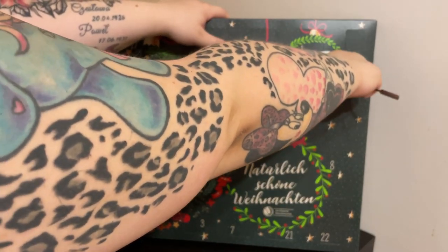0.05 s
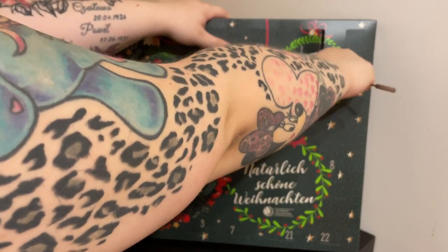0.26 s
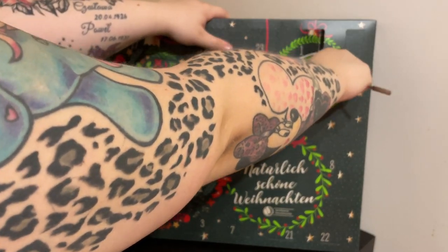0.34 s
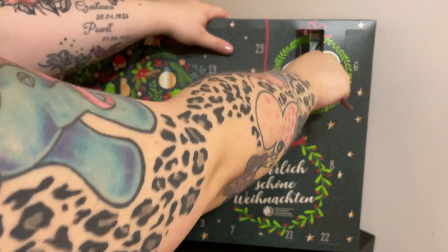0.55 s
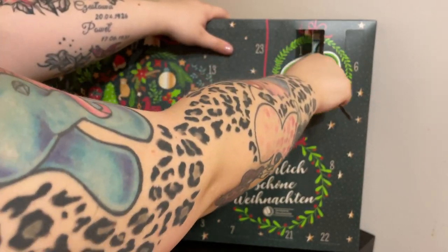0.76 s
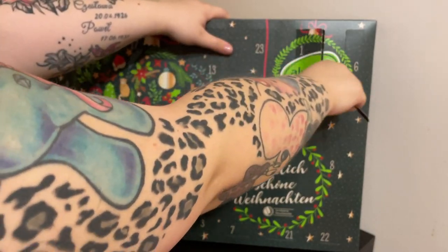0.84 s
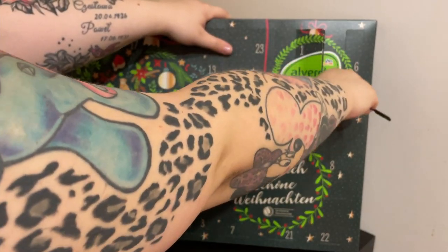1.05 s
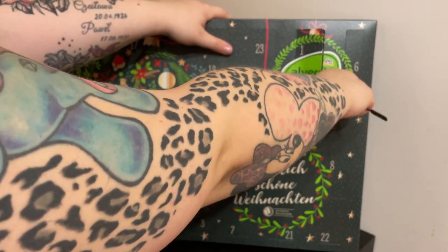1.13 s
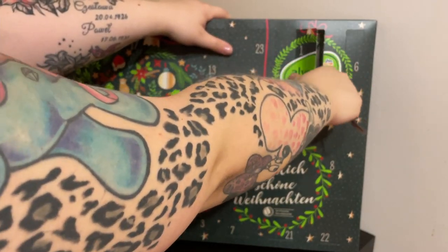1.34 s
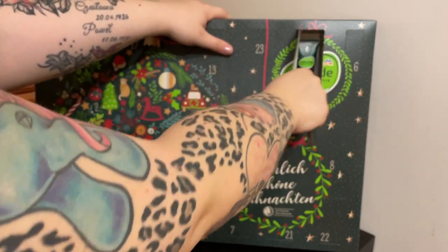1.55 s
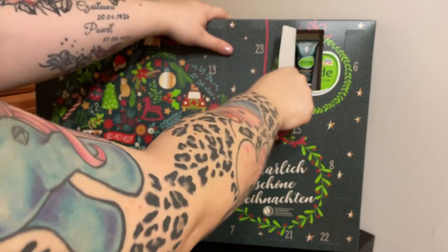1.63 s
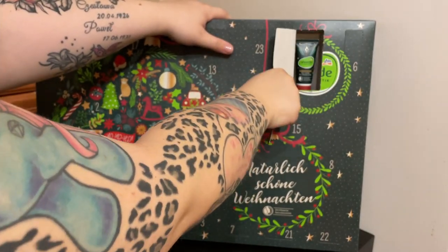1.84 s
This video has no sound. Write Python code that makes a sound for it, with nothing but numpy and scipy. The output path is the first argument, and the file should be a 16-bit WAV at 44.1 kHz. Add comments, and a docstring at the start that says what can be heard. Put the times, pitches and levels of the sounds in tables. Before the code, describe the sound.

A perforated cardboard flap is pried open: faint finger taps, a quick cluster of crisp snaps and a short rip, a quieter pause, then two more hollow pops and light rubbing, close-miked in a small quiet room.

```python
"""Opening a perforated cardboard box

Fingers pry open a perforated flap in a shallow cardboard box, close to the microphone in a small room.
After a faint click, paper bridges snap: noise cracks through the card and the box modes thump.
Random grains rip fibres and rub fingertips over the card; taps knock it and a nail hisses along it.
The flap creaks in almost regular slips, and rings when it is nudged.
A dense decaying tail, one late bass echo and quiet filtered noise make the room."""
import sys
import numpy as np
from scipy import signal
from scipy.fft import rfft, irfft
from scipy.io import wavfile

SR = 44100
rng = np.random.default_rng(int(sys.argv[2]) if len(sys.argv) > 2 else 0)


def transcribe(u):
    """Save the signal u as a 16-bit wav file named by the first command-line argument.

    u: samples, shape (n,) or (channels, n), limited to [-1, 1]; the rate is SR.
    q: integer samples, one column per channel.
    """
    v = np.clip(np.atleast_2d(u).T, -1, 1)
    q = np.round(v * 32767).astype(np.int16)
    wavfile.write(sys.argv[1], SR, q)


N = 83790
HZ = np.fft.rfftfreq(8192, 1 / SR)  # frequencies at which filter gains are given
BLOW_S = 0.015  # time over which the level of a blow is reckoned
BLOW_GAIN = np.sqrt(SR * BLOW_S)

# Band centres of a snap [Hz]
BANDS_HZ = [100, 280, 630, 1650, 4500, 11000]
# Bridges snapping, levels before the overall tone:
# (time [s], ring of the freed flap [Hz], ring of the torn edge [Hz], level in each of six bands [dB])
SNAPS = [(0.1971, 715, 2390, -53, -34.5, -25, -33, -41, -44.5),
         (0.2323, 1519, 2193, -39, -24.5, -18.5, -22, -35, -37.5),
         (0.2627, 1665, 2440, -44.5, -57, -19, -25.5, -41, -36),
         (0.2668, 312, 1130, -40.5, -18, -22, -27, -41, -50),
         (0.2931, 286, 1960, -37, -26.5, -26, -27, -36, -44.5),
         (0.411, 563, 3425, -51.5, -30.5, -25, -25, -37.5, -37),
         (0.542, 241.4, 3840, -40.5, -24.5, -29, -36.5, -55.5, -40.5),
         (1.4538, 292.7, 799, -34.5, -26.5, -26, -37, -38.5, -41),
         (1.592, 549, 808, -36, -21.5, -27.5, -31.5, -39, -42)]


def add_snaps(box, modes):
    """Paper bridges fail one by one, each amid a swell of tiny fractures."""
    for time, flap_hz, edge_hz, *levels in SNAPS:
        add(box, *strain(time, edge_hz, levels))
        add(box, time, snap(flap_hz, edge_hz, levels, modes))


FLAP_DB, FLAP_CYCLES = -5, 28  # the flap dies 60 dB in this many cycles
EDGE_DB, EDGE_CYCLES = -5.5, 47  # so does the torn edge


def snap(flap_hz, edge_hz, levels, modes):
    """A bridge gives way: a blow to the box, and the freed flap and its torn edge ring briefly."""
    bands = list(zip(BANDS_HZ, levels))
    flap = amp(FLAP_DB + read(bands, flap_hz)) * mode(flap_hz, FLAP_CYCLES / flap_hz)
    edge = amp(EDGE_DB + read(bands, edge_hz)) * mode(edge_hz, EDGE_CYCLES / edge_hz)
    return blow(BANDS_HZ, levels, modes) + (flap + edge) * BLOW_GAIN


STRAIN_S, STRAIN_DB = 0.0068, -17.5  # time constant on either side of the snap; level against the snap


def strain(time, edge_hz, levels):
    """A quick, ragged swell of tiny fractures around a snap, coloured by the tearing edge."""
    noise = rng.standard_normal((2, 2048)) * rng.exponential(1, 2048) ** 2
    t = (np.arange(noise.shape[1]) - noise.shape[1] / 2) / SR
    swell = unit(noise * np.exp(-abs(t) / STRAIN_S))
    extra_db = STRAIN_DB + BRIGHT_DB * bump(edge_hz)
    return time + t[0], toned(swell, BANDS_HZ, levels, extra_db) * BLOW_GAIN


# Modes of the hollow box, levels before BOX_DB and the blow: (frequency [Hz], level [dB], t60 [s])
BOX = [(226.3, -9, 0.17), (247, -3.5, 0.14), (294.2, 2, 0.16), (346.3, 0.5, 0.15), (514.4, -13, 0.086),
       (591.8, -6, 0.084), (718, -14, 0.11), (771, -17, 0.22), (1113, -1.5, 0.045)]
BOX_DB = -10


def box_modes():
    """The hollow box resonates at several frequencies, each with its own decay."""
    return np.array([mode(hz, t60) for hz, _, t60 in BOX])


def blow(centres, levels, modes):
    """The panel cracks and the modes of the box ring on."""
    hz, db, _ = np.transpose(BOX)
    blow_db = read(list(zip(centres, levels)), hz)
    out = np.tensordot(amp(BOX_DB + db + blow_db), modes, 1)
    add(out, 0, toned(panel(), centres, levels))
    return out * BLOW_GAIN


# Ring of the card panel: (frequency [Hz], t60 [s])
PANEL = [(100, 0.015), (300, 0.15), (700, 0.098), (2000, 0.034), (12000, 0.017)]
CRACK_S, CRACK_DB = 0.0011, 1.5  # time to the crack's peak; level against the ring


def panel():
    """Middle and side response of the card: a crack and its short ring."""
    body = ring(PANEL, rise_s=0.0077, size=8192)
    u = np.arange(body.shape[1]) / SR / CRACK_S
    crack = unit(rng.standard_normal(body.shape) * u * np.exp(-u))
    return flat(body + amp(CRACK_DB) * crack)


# Overall tone: uneven mids, a narrow dip near 8 kHz, steeply falling top: (frequency [Hz], gain [dB])
TONE = [(30, -29), (65, -3.5), (170, -4.5), (300, -1.5), (400, -7), (560, -4.5), (900, -5.5), (1400, -6.5),
        (2300, -2.5), (2700, -6.5), (3600, -3), (7200, -7), (8200, -21.5), (9500, -8.5), (13000, -13.5),
        (15500, -30.5)]


def toned(x, centres, levels, extra_db=0):
    """Gives a flat sound the overall tone and a level in each band."""
    # Spread each level over a bandwidth that grows with its centre
    density = np.array(levels) - 10 * np.log10(2 * np.array(centres) / SR)
    db = read(list(zip(centres, density)), HZ) + read(TONE, HZ) + extra_db
    return np.array([colour(c, db) for c in x])


# Fibres ripping, levels before the overall tone:
# (start [s], crest [s], end [s], contact resonance [Hz], body [dB], rasp [dB], fizz [dB])
RIPS = [(0.246, 0.26, 0.272, 2300, -35, -29.5, -36), (0.482, 0.486, 0.506, 1860, -36.5, -43, -40),
        (0.493, 0.535, 0.566, 3360, -48, -51.5, -47)]
RIP_GRAINS_PER_S, RIP_SPREAD_DB = 2400, 8.5


def add_rips(box):
    """Fibres part in dense, uneven grains."""
    for start, crest, end, hz, *levels in RIPS:
        add(box, start, stroke(start, crest, end, hz, levels, RIP_GRAINS_PER_S, RIP_SPREAD_DB))


# Fingertips and flap sliding, levels before the overall tone:
# (start [s], crest [s], end [s], contact resonance [Hz], body [dB], rasp [dB], fizz [dB])
RUBS = [(0.043, 0.066, 0.135, 2400, -54.5, -64, -67.5), (0.761, 0.812, 0.875, 2110, -56, -67.5, -68.5),
        (1.111, 1.148, 1.36, 2600, -64, -68, -97), (1.276, 1.307, 1.36, 1810, -53.5, -66.5, -80),
        (1.749, 1.77, 1.84, 2800, -50.5, -51, -72.5)]
RUB_GRAINS_PER_S, RUB_SPREAD_DB = 850, 5


def add_rubs(box):
    """Skin and card slide in sparser, more even grains than a rip."""
    for start, crest, end, hz, *levels in RUBS:
        add(box, start, stroke(start, crest, end, hz, levels, RUB_GRAINS_PER_S, RUB_SPREAD_DB))


def stroke(start, crest, end, bright_hz, levels, rate, spread_db):
    """Fibres catch and let go at random under a stroke that swells and fades."""
    t = np.arange(start, end, 1 / SR)
    size_db = spread_db * np.minimum(rng.exponential(1, SR // 2), 3)
    sizes = amp(size_db) * rng.choice([-1, 1], SR // 2)
    force = np.interp(t, [start, crest, end], [0, 1, 0]) ** 0.87
    caught = rng.random(len(sizes)) < rate / SR
    grains = (sizes * caught)[:len(t)] * force
    return friction(unit(grains) * np.linalg.norm(force), bright_hz, levels)


# Band centres of body, rasp and fizz [Hz]
STROKE_HZ = [350, 2200, 9000]
BRIGHT_DB, BRIGHT_OCTAVES = 5, .3  # resonance at the point of contact; width of every bump
HOLLOW_HZ, HOLLOW_DB = 258.5, 9.5  # air in the box, stirred by rubbing


def friction(slips, bright_hz, levels, count=3):
    """Slips drive a few spots of the panel, with one resonance at the contact and one in the box air."""
    bump_db = BRIGHT_DB * bump(bright_hz) + HOLLOW_DB * bump(HOLLOW_HZ)
    spot = rng.integers(0, count, SR)[:len(slips)]
    rung = sum(signal.fftconvolve((slips * (spot == k))[None], panel(), axes=1) for k in range(count))
    return toned(rung, STROKE_HZ, levels, bump_db)


# Stick-slip creaks, levels before the overall tone:
# (start [s], length [s], mean slip rate [1/s], contact resonance [Hz], body [dB], rasp [dB], fizz [dB])
CREAKS = [(1.87, 0.035, 280, 2940, -44.5, -42.5, -61.5)]


def add_creaks(box):
    """The flap creaks as it folds back."""
    for start, length, rate, hz, *levels in CREAKS:
        add(box, start, creak(length, rate, hz, levels))


SLIP_JITTER = 0.13  # spread of the slip intervals, as a fraction of the mean


def creak(length, rate, bright_hz, levels):
    """The fold sticks and slips almost regularly, ever more weakly."""
    t = np.arange(0, length, 1 / SR)
    cycles = np.cumsum(1 + SLIP_JITTER * rng.standard_normal(size=64)) - 1
    at = (abs(cycles) / rate * SR).astype(int)
    slips = np.zeros(len(t))
    slips[at[at < len(t)]] = np.sqrt(SR / rate)
    return friction(slips * (1 - (t / length) ** 2), bright_hz, levels)


# A faint click as the sound begins, then fingers and nails tapping, levels before the overall tone:
# (time [s], body [dB], rasp [dB], fizz [dB])
CLICK_AND_TAPS = [(0.002, -50, -61, -84.5), (0.047, -45, -65.5, -97), (0.093, -48.5, -63, -76),
                  (0.164, -52, -61.5, -100), (0.2572, -26.5, -45, -48), (1.093, -46, -56, -89.5),
                  (1.2691, -53, -63, -91.5), (1.6629, -49, -50, -57.5)]


def add_click_and_taps(box, modes):
    """A faint click as the sound begins, then finger and nail taps knocking the box; each rings the box modes."""
    for time, *levels in CLICK_AND_TAPS:
        add(box, time, blow(STROKE_HZ, levels, modes))


# The loose flap nudged, level before each mode's own: (time [s], level [dB])
FLAP_PAT = (1.7412, -39)
# Modes of the open flap, levels against the nudge: (frequency [Hz], level [dB])
OPEN_FLAP = [(431, -2), (750, -15), (1125, -13)]
OPEN_FLAP_T60_S = 0.071


def pat(time, db):
    """A soft knock rings the modes of the open flap."""
    rung = sum(amp(db + mode_db) * mode(hz, OPEN_FLAP_T60_S) for hz, mode_db in OPEN_FLAP)
    return time, rung * BLOW_GAIN


# A nail hissing along the glossy card: (start [s], crest [s], end [s], centre [Hz], level [dB])
SLIDE = (1.745, 1.82, 1.885, 6600, -63)


def slide(start, crest, end, hz, db):
    """A smooth, narrow hiss that swells and fades with the speed of the nail."""
    speed = np.interp(np.arange(start, end, 1 / SR), [start, crest, end], [0, 1, 0])
    noise = rng.standard_normal((2, SR // 2))
    hiss = np.array([band(c, hz) for c in noise])[:, :len(speed)]
    return start, amp(db) * speed * unit(hiss) * np.sqrt(len(speed))


# Ring of the room: (frequency [Hz], t60 [s])
ROOM = [(60, 0.7), (150, 0.18), (400, 0.39), (1500, 0.33), (5000, 0.48), (12000, 0.4)]
# Strength of the room: (frequency [Hz], gain [dB])
WET = [(70, 6), (300, -9.5), (2000, -10), (5000, -7.5), (12000, -6.5)]
ROOM_RISE_S, BUILD_CYCLES = 0.0014, 1.8  # build-up time constants: overall, and in cycles of each band
ECHO_S, ECHO_HZ, ECHO_DB = .034, 99.1, -3  # the bass comes back late from the far wall


def room(x):
    """Adds the tail of a small room and one late echo of the bass."""
    tail = flat(ring(ROOM, ROOM_RISE_S, size=32768, build_cycles=BUILD_CYCLES))
    sent = colour(x[0], read(WET, HZ))  # only the middle feeds the tail
    wet = np.array([signal.fftconvolve(sent, c)[:N] for c in tail])
    add(wet, ECHO_S, amp(ECHO_DB) * np.array([band(c, ECHO_HZ) for c in x]))
    return x + wet


# Shape of the room tone, before scaling to HUSH_DB: (frequency [Hz], relative density [dB per Hz])
HUSH = [(25, -6), (65, 0.5), (300, -16.5), (1000, -27.5), (6000, -41), (15000, -49)]
HUSH_DB = -69


def hush():
    """Quiet room tone: steady noise, strongest in the bass."""
    noise = np.array([colour(c, read(HUSH, HZ)) for c in rng.standard_normal((2, N))])
    return amp(HUSH_DB) * unit(noise) * np.sqrt(N)


def mode(hz, t60):
    """One dying resonance, in middle and side."""
    t = np.arange(SR // 3) / SR
    phase = [[0], [rng.random()]]  # in cycles, middle and side
    wave = np.sin(2 * np.pi * (hz * t + phase))
    return unit(wave * amp(-60 * t / t60) * (1 - np.exp(-t * hz)))


def ring(t60s, rise_s, size, build_cycles=0):
    """Dense random ringing, each band building up and dying at its own speed."""
    hz, t, z = signal.stft(rng.standard_normal((2, size)), SR, nperseg=256)
    t60 = read(t60s, hz)[:, None]
    build_hz = np.maximum(hz, hz[1] / 2)[:, None]
    build = 1 - np.exp(-(t + t[1]) * build_hz / (build_cycles + 1e-9))
    tail = signal.istft(z * build * amp(-60 * t / t60) / np.sqrt(t60), SR)[1][:, :size]
    return unit(tail * (1 - np.exp(-np.arange(size) / SR / rise_s)))


def bump(hz):
    """A resonance of height one on a log-frequency axis."""
    return np.exp(-(np.log2((HZ + 1) / hz) / BRIGHT_OCTAVES) ** 2)


def band(x, hz):
    """Favours the band around one resonance, over a faint floor at all frequencies."""
    return colour(x, 20 * np.log10(bump(hz) + .02))


def colour(x, db):
    """Causal minimum-phase filter with the given gain at each of HZ."""
    log_gain = irfft(np.log(amp(db)))
    n = len(log_gain) // 2
    # Folding the cepstrum onto positive times makes the filter causal
    folded = np.r_[log_gain[0], 2 * log_gain[1:n], np.zeros(n)]
    taps = irfft(np.exp(rfft(folded)))[:n]
    return signal.fftconvolve(x, taps)[:len(x)]


def smooth_db(x):
    """Power spectrum in dB, averaged over about half an octave."""
    total = np.cumsum(abs(rfft(x, 2 * len(HZ) - 2))[::-1] ** 2)[::-1]
    k = np.arange(len(HZ))
    lo = np.clip(k * .82 - 6, 0, None).astype(int)
    hi = np.clip(k * 1.2 + 8, 0, k[-1] - 1).astype(int)
    return 10 * np.log10((total[lo] - total[hi]) / (hi - lo) + 1e-12)


def flat(x):
    """Evens out the broad spectrum of each channel."""
    return np.array([colour(c, -smooth_db(c)) for c in x])


def amp(db):
    """Decibels to gain."""
    return 10 ** (np.asarray(db) / 20)


def unit(x):
    """Scales to an energy of one per channel."""
    return x / np.sqrt(np.sum(x ** 2, -1, keepdims=True) + 1e-20)


def read(points, hz):
    """Reads a table on a log-frequency axis."""
    f, value = np.transpose(points)
    return np.interp(np.log(hz + 1), np.log(f + 1), value)


def add(mix, time, sound):
    """Mixes a sound in at a time."""
    part = mix[:, max(round(time * SR), 0):][:, :sound.shape[1]]
    part += sound[:, :part.shape[1]]


# Gain of the side channel: (frequency [Hz], gain [dB])
WIDTH = [(100, -20), (260, -18.5), (520, -4.5), (1000, -7), (2000, -7.5), (4000, -6.5), (8000, 4.5),
         (12000, -5.5)]


def scene():
    """All handling sounds in the room, spread from middle and side to left and right."""
    box = np.zeros((2, N))  # middle and side
    modes = box_modes()
    add_snaps(box, modes)
    add(box, *pat(*FLAP_PAT))
    add(box, *slide(*SLIDE))
    add_click_and_taps(box, modes)
    add_rips(box)
    add_rubs(box)
    add_creaks(box)
    mid, side = room(box) + hush()
    side = colour(side, read(WIDTH, HZ))
    balance_db = [[.4], [-.4]]  # left, right
    return np.array([mid + side, mid - side]) * amp(balance_db)


CUTOFF_HZ = 15900


def record(dry):
    """The band limit of the recorder: a steep low-pass filter."""
    low_pass = signal.firwin(511, CUTOFF_HZ, window=("kaiser", 9), fs=SR)
    return signal.oaconvolve(dry, low_pass[None], "same")


dry = scene()
out = record(dry)
transcribe(out)
```